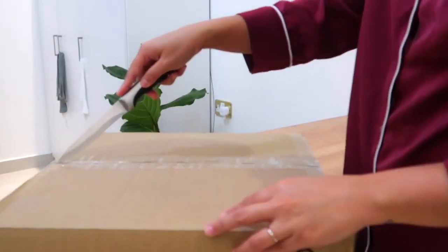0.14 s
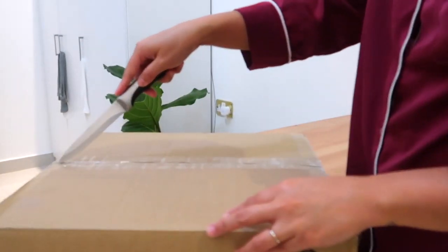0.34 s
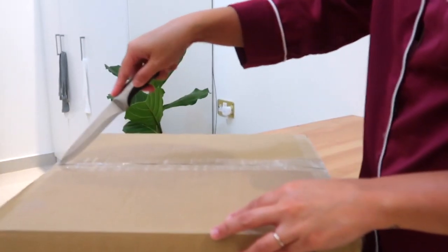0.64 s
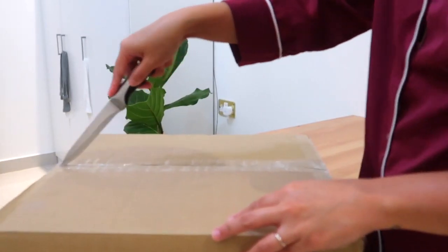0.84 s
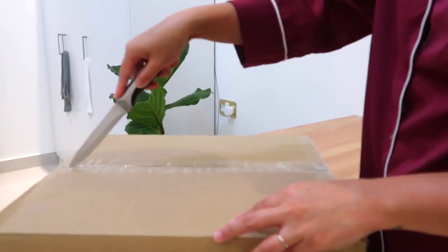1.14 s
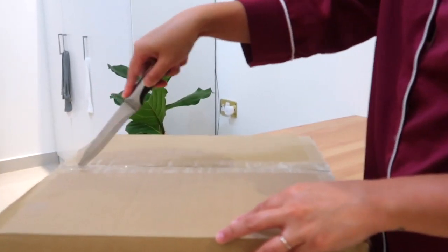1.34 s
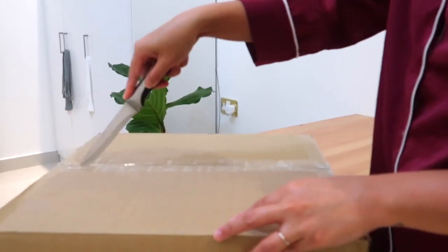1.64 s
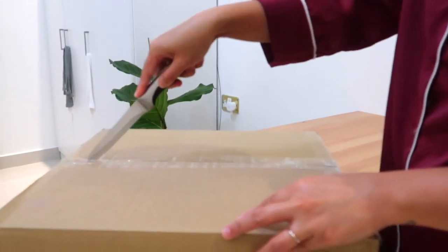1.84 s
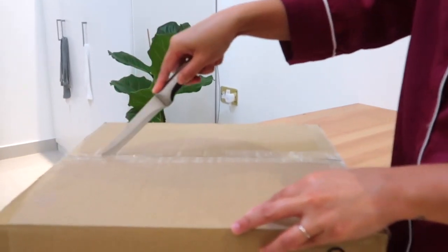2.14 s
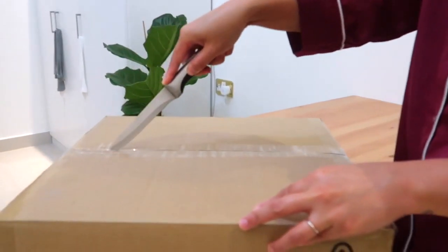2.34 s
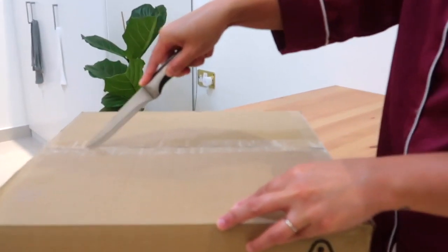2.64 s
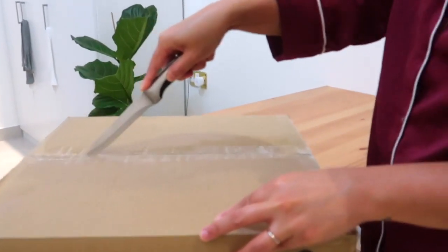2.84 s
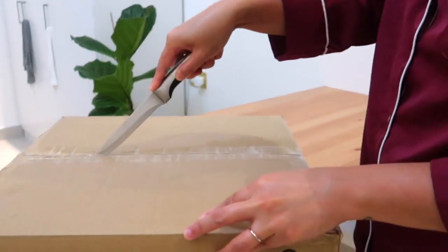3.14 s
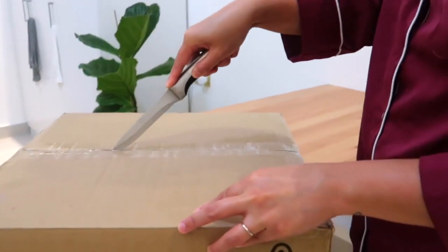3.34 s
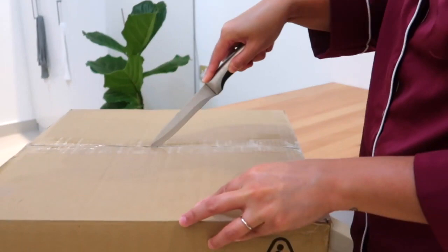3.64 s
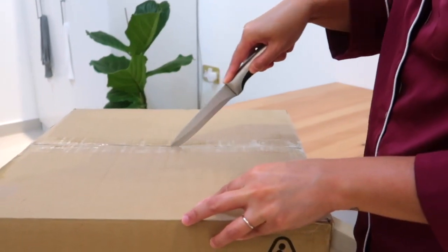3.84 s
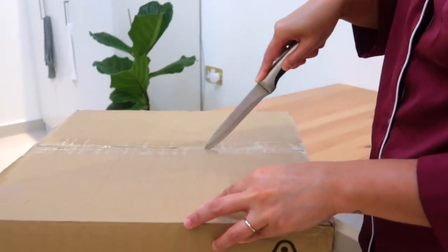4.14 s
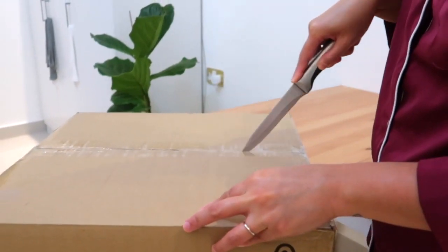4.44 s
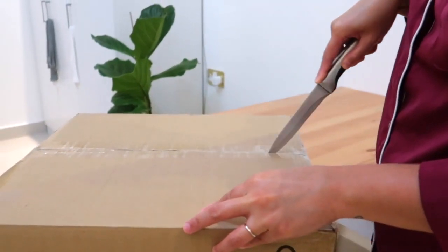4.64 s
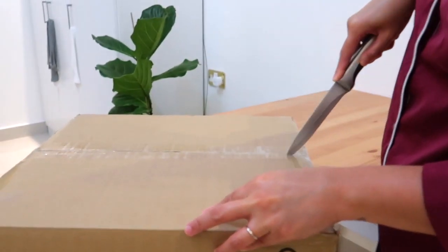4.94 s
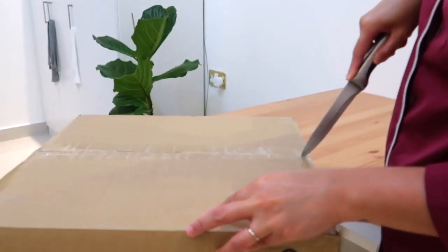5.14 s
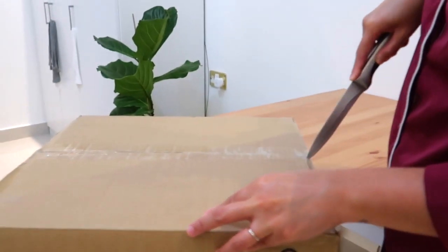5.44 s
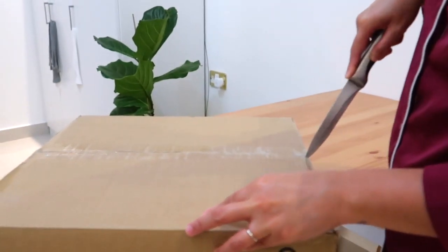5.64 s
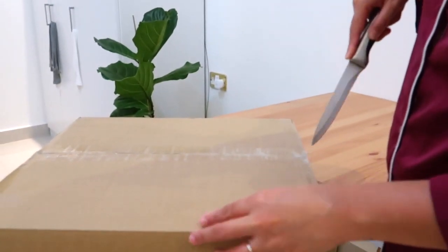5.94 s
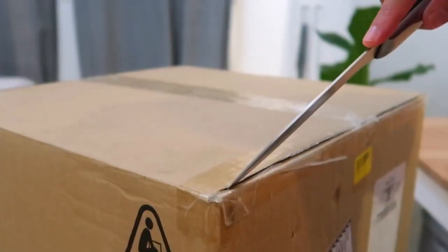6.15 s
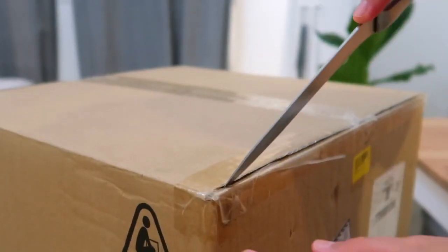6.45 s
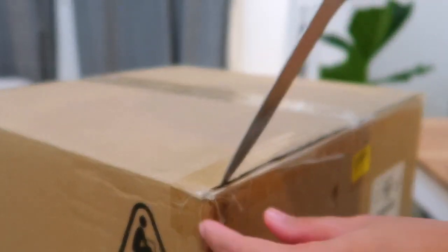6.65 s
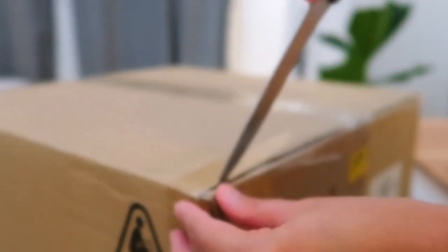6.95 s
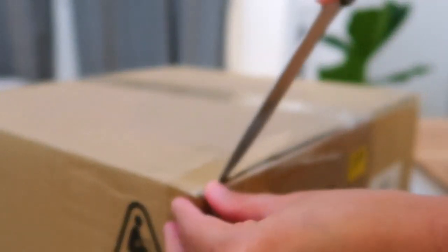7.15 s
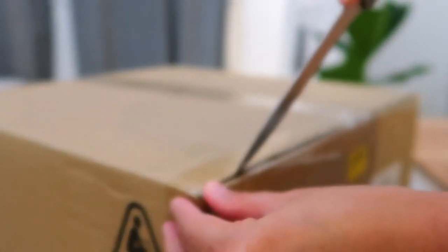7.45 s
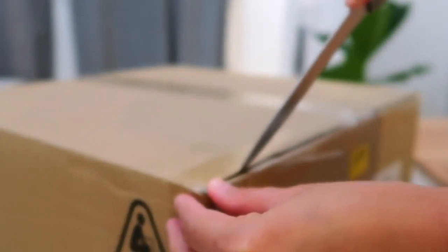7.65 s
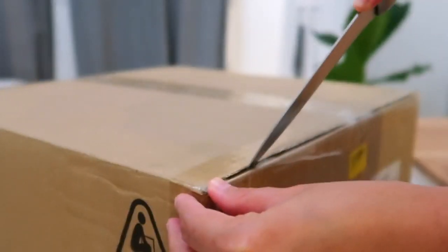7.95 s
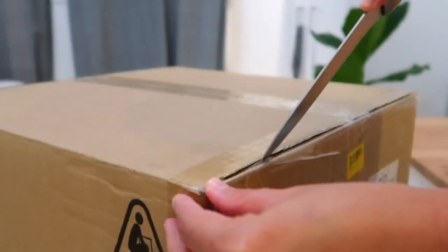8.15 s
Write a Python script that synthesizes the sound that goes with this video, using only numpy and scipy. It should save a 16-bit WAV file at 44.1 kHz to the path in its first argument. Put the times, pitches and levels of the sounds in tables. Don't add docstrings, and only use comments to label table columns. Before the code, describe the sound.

Close-up of a knife opening a cardboard box in a small reflective room. Dry fibre rasp and thin tape hiss come in uneven jerks, broken by sudden cracks, ticks and hollow booms. The cutting builds to its loudest knocks around the middle, falls to soft drag rumble, then returns in tight clusters of sharper snaps. A steady low mains hum and faint air lie underneath.

```python
import sys
import numpy as np
from scipy import signal
from scipy.fft import rfft, irfft, next_fast_len
from scipy.io import wavfile
from scipy.ndimage import uniform_filter1d

SR = 44100
rng = np.random.default_rng(int(sys.argv[2]) if len(sys.argv) > 2 else 0)


def makeup_ratio(level_db):
    decades = np.asarray(level_db, float) / 20
    return 10 ** decades


def unload_audio(sound):
    columns = np.transpose(np.atleast_2d(sound))
    steps = np.round(np.clip(columns, -1, 1) * 32767)
    wavfile.write(sys.argv[1], SR, steps.astype(np.int16))


N = 366471
T = np.arange(N) / SR

# start in seconds, length in seconds, speed as tape hiss in dB,
# bite into the board in dB over the hiss.
PULLS = [(0.0, 0.096, -66.5, 11.5), (0.268, 0.022, -68, -8), (1.068, .06, -67.5, 14),
         (1.22, 0.033, -77, 14), (1.397, 0.16, -74.5, 17), (1.73, 0.057, -77, 29),
         (1.984, .13, -67.5, 18.5), (2.222, 0.042, -68, 8), (2.38, 0.11, -73.5, 23.5), (2.51, 0.1, -69, 14),
         (2.815, 0.37, -65.5, 14.5), (3.197, 0.044, -58.5, 13), (3.264, 0.13, -63, 13),
         (3.368, .19, -60, 10), (3.574, 0.099, -58.5, 3), (3.697, 0.2, -58.5, 7), (3.99, 0.14, -66.5, 11),
         (4.082, 0.58, -60.5, 9.5), (4.656, 0.12, -53.5, 10), (4.79, 0.15, -68.5, 19.5),
         (4.992, .15, -61.5, 9), (5.194, 0.24, -70.5, 14), (5.98, .1, -79, 16), (6.21, 0.05, -80, 21),
         (6.818, 0.065, -61, -8), (6.975, .05, -76, 8), (7.455, 0.12, -62, 9), (7.898, 0.054, -61, 6),
         (8.066, .2, -64, -3)]
SWELL_SHARE, RELEASE_S = 0.29, 0.032
REST_HISS_DB, REST_RASP_DB = -81, -77
AFTER_DB, AFTER_S = -24, 0.064
# frequency in Hz, level in dB per Hz.
RASP_COLOUR = [(260, -8), (450, 2.5), (556, -0.5), (595, -6), (752, 5), (920, -3), (1440, -3.5),
               (3180, -12), (6500, -16), (8450, -38), (14300, -120)]
# frequency in Hz, level in dB per Hz.
HISS_COLOUR = [(2650, -2), (4500, -3), (6490, -1.5), (8330, -4.5), (12700, -4), (15200, -16), (15700, -33),
               (16000, -62)]
PATCHY_DB = 2.2
CRACKLE_PER_S, CRACKLE_DB, CRACKLE_SPREAD_DB, SCUFF_S = 35, -5, 5, .004
# time in seconds, level in dB.
SING = [
    (2.85, -73),
    (2.92, -64),
    (3.1, -67),
    (3.18, -75),
]
# frequency in Hz, width in Hz, level in dB.
BOX_MODES = [(113, 42, -1.5), (183, 66, 0), (270, 66, -8), (339.4, 42, -6)]
# time in seconds, drag rumble in dB.
LOAD = [(0, -60), (.4, -58), (1, -47.5), (1.5, -53), (2, -52), (3.1, -50), (3.7, -47.5), (4.35, -42),
        (4.7, -40.5), (5, -49), (5.45, -45), (5.8, -54), (6.4, -51.5), (7.1, -48.5), (7.6, -46),
        (8.31, -53)]

# frequency in Hz, level in dB per Hz.
AIR_COLOUR = [(12, -31), (20, -26), (49, -4.5), (97, -4.5), (118, -6), (151, -7.5), (217, -4.5),
              (263, -10.5), (511, -20.5), (587, -14.5), (914, -27), (3760, -39), (8380, -48),
              (11100, -55.5), (15000, -62)]
AIR_DB = -49
# frequency in Hz, side minus mid in dB.
AIR_SIDE = [(60, -59), (110, -37), (200, -21.5), (380, -4.5), (700, -9), (1290, 1), (2380, 1), (4400, 3),
            (8120, 1.5), (15000, 8)]
# frequency in Hz, level in dB, wobble in dB.
HUM = [(101, -44, -0.5), (148.1, -52, 1), (50.1, -60.5, -3.5), (191.1, -60.5, 6)]

# time in seconds, crack in dB, brightness in dB.
CATCHES = [(0.2781, -41.5, -2), (1.067, -40, -17), (1.2494, -40, -10), (2.0762, -39, -11),
           (2.204, -37, -10), (2.2613, -43.5, 3), (2.6609, -48, -13), (2.7017, -40, -5), (3.2872, -41, -16),
           (3.7776, -41.5, 2), (4.302, -33, -5), (5.0417, -39, -8), (5.0984, -53, -3), (5.6612, -45, -5),
           (6.2174, -47, -16), (6.7914, -49, -9), (8.005, -49, 7)]
# time in seconds, tick in dB.
TICKS = [(1.0764, -42), (1.4624, -46), (2.815, -47), (3.66, -46), (6.08, -51), (7.16, -48), (2.8, -35),
         (3.6227, -34.5), (4.0204, -40.5), (4.5467, -27.5), (7.3374, -38)]
# time in seconds, crack in dB, flap knock in dB, tape tick in dB.
SNAPS_TOP = [(1.1063, -24.5, -55, -38), (1.1166, -26, -31.5, -61), (1.2321, -32.5, -55, -52),
             (1.729, -27, -34, -47), (1.7373, -28, -40, -46), (1.7444, -22.5, -39, -47),
             (1.7544, -27, -59, -41), (2.1952, -25.5, -58, -55), (2.5242, -29, -44, -44),
             (2.5444, -34, -35, -40), (3.2171, -27, -45, -51), (3.2303, -28.5, -33.5, -41),
             (3.2448, -29.5, -40, -49), (3.5805, -34.5, -54, -60), (3.9235, -26.5, -31, -51),
             (4.0954, -33.5, -45, -38), (4.3611, -26.5, -31, -28.5), (4.4683, -37, -49, -37),
             (4.4943, -35.5, -39, -57), (4.6214, -32.5, -39, -42), (4.6745, -23.5, -26, -36),
             (4.6942, -17.5, -22, -28.5), (4.7664, -36, -44, -35), (5.1994, -34.5, -34.5, -50),
             (5.3628, -31.5, -36, -36), (5.3707, -13.5, -19, -59)]
# time in seconds, crack in dB, flap knock in dB, tape tick in dB.
SNAPS_SIDE = [(6.8273, -35.5, -41, -59), (6.8383, -34.5, -41, -53), (6.8621, -46, -45, -46),
              (6.8732, -30.5, -38, -83), (6.884, -40, -36, -45), (7.5156, -21.5, -23, -21.5),
              (7.572, -25, -31, -24.5), (7.911, -42.5, -57, -38.5), (7.9254, -41, -38.5, -39),
              (7.9474, -29.5, -51, -30.5), (8.1045, -32, -35.5, -33), (8.115, -28, -40, -33.5),
              (8.1328, -25.5, -34, -45), (8.1713, -24, -29, -30.5), (8.267, -26, -34, -33)]
# low edge in Hz, high edge in Hz, gain in dB.
PARTS = [
    (944, 2960, 1.5),
    (377, 778, 3.5),
    (2190, 6170, 4),
    (6800, 10950, -2),
]
CATCH_KNOCK_DB, TICK_BODY_DB = -4, -27
FIBRE_DB, FIBRE_SHARE = -7, 0.11
TEAR_TOP_MS, TEAR_SIDE_MS, TEAR_CATCH_MS, TEAR_TICK_MS = 1.64, 1.83, 1.2, 0.4
TABLE_DB = -7

# time in seconds, peak in dB, frequency in Hz.
THUMPS = [(1.106, -26, 183), (2.075, -28, 196), (2.423, -26.5, 229), (2.523, -25, 230), (2.843, -27, 208),
          (3.217, -26, 149), (3.577, -29, 193), (3.92, -24.5, 189), (4.298, -23, 148), (4.36, -10, 188),
          (4.468, -29, 143), (4.495, -22.5, 234), (4.621, -26, 203), (4.676, -23, 200), (4.695, -8, 186),
          (4.766, -28, 143), (5.372, -11.5, 256), (5.659, -32, 144), (5.909, -29, 184), (6.239, -29, 144),
          (7.516, -18, 294), (7.572, -22, 266), (7.947, -21.5, 295), (8.105, -28.5, 245), (8.169, -28, 234),
          (8.27, -24.5, 300)]
# time in seconds, peak in dB, frequency
# in Hz.
RINGS = [(1.107, -20.5, 820), (1.232, -35, 1420), (1.729, -27, 1880), (1.744, -30, 1880),
         (1.754, -18, 1750), (2.194, -31, 2020), (2.524, -42, 1830), (3.218, -27, 1360), (3.231, -33, 1430),
         (3.244, -27.5, 1330), (3.923, -26, 2980), (4.361, -19.5, 2030), (4.469, -29, 2480),
         (4.494, -32, 800), (4.677, -12.5, 2820), (4.695, -19, 706), (5.371, -42, 676),
         (6.826, -30.5, 1860), (6.871, -30.5, 1060), (7.516, -14.5, 1084), (7.572, -20, 1770),
         (7.948, -28.5, 1080), (8.133, -29, 700), (8.17, -25, 1900), (8.269, -20.5, 1370),
         (1.07, -31, 600), (2.429, -32, 580), (2.449, -33, 490), (2.66, -38, 1190), (3.931, -30, 1180),
         (1.744, -26, 476), (4.36, -28.5, 600), (5.373, -9.5, 505), (5.384, -22, 505), (4.36, -20, 331),
         (5.373, -10, 303)]

# low edge in Hz, high edge in Hz, decay time to -60 dB in seconds,
# level in dB, side minus mid in dB.
ROOM = [(63, 550, 0.49, -6, -70), (440, 2280, 0.41, -5.5, -32), (1370, 4400, 0.3, -3.5, -12),
        (4200, 10600, 0.28, -8, 2.5), (9250, 25000, 0.058, -13, 13.5)]
WALL_S, WALL_DB, WALLS_FROM_S = .026, -7, .011


def unit(x):
    return x / np.sqrt(np.mean(x ** 2))


def band(x, lo_hz, hi_hz):
    return signal.sosfilt(signal.butter(2, [lo_hz, min(hi_hz, .45 * SR)], "band", fs=SR, output="sos"), x)


def ring(x, hz, width_hz):
    return signal.lfilter(*signal.iirpeak(hz, hz / width_hz, fs=SR), x)


def fading(x, fade_s):
    return signal.lfilter([1], [1, -np.exp(-1 / (fade_s * SR))], x)


def colour(x, points):
    hz, db = np.transpose(points)
    size = next_fast_len(N)
    f = np.arange(size // 2 + 1) * SR / size + 1
    gain = makeup_ratio(np.interp(np.log(f), np.log(hz), db))
    return irfft(rfft(x, size) * gain, size)[:N]


def walk(rate):
    hold = int(SR / rate)
    steps = np.repeat(rng.standard_normal(N // hold + 1), hold)
    return unit(uniform_filter1d(uniform_filter1d(steps, hold), hold)[:N])


def sparse_slips(rate, spread_db, limit):
    return (rng.random(N) < rate / SR) * makeup_ratio(spread_db * np.minimum(rng.exponential(size=N), limit))


def grit(rate, spread_db):
    slips = sparse_slips(rate, spread_db, 4)
    return unit(rng.standard_normal(N) * (1 + slips))


def patchy(x):
    centres_hz = 500 * 2 ** np.arange(0, 5, 1 / 3)
    return sum(ring(x, hz, .3 * hz) * makeup_ratio(PATCHY_DB * walk(rate=14)) for hz in centres_hz)


def effort():
    rasp, hiss = makeup_ratio(REST_RASP_DB) + 0 * T, makeup_ratio(REST_HISS_DB) + 0 * T
    for s, length, db, bite_db in PULLS:
        swell = np.clip((T - s) / (SWELL_SHARE * length) + 0.22, 0, 1)
        shape = swell * np.exp(-np.maximum(T - s - length, 0) / RELEASE_S)
        rasp = rasp + makeup_ratio(db + bite_db) * shape
        hiss = hiss + makeup_ratio(db) * shape
    kicks = np.zeros(N)
    for s, crack_db, *_ in catches():
        kicks[int(s * SR)] = makeup_ratio(crack_db + AFTER_DB)
    return rasp + fading(kicks, AFTER_S), hiss


def crackle():
    out = 0
    for lo_hz, hi_hz, db in [(900, 3000, 0), (2000, 6500, 0), (5000, 11000, -5)]:
        scuffs = fading(sparse_slips(CRACKLE_PER_S, CRACKLE_SPREAD_DB, 2.5), SCUFF_S)
        out = out + makeup_ratio(db) * unit(band(scuffs * rng.standard_normal(N), lo_hz, hi_hz))
    return unit(out)


def box_rumble():
    drag = rng.standard_normal(N) * makeup_ratio(2.5 * walk(rate=18))
    modes = sum(makeup_ratio(db) * ring(ring(drag, hz, w), hz, 1.27 * w) for hz, w, db in BOX_MODES)
    return unit(modes) * makeup_ratio(np.interp(T, *np.transpose(LOAD)))


def slide():
    rasp_gain, hiss_gain = effort()
    slips = patchy(grit(rate=1200, spread_db=4.5)) * makeup_ratio(1.6 * walk(rate=45))
    rasp = unit(colour(slips, RASP_COLOUR)) * makeup_ratio(-5.5) * rasp_gain
    hiss = unit(colour(slips, HISS_COLOUR)) * makeup_ratio(3.5 + 0.19 * walk(rate=60)) * hiss_gain
    sing_gain = makeup_ratio(np.interp(T, *np.transpose(SING), -90, -90))
    sing = unit(ring(ring(slips, 2260, 600), 1720, 800)) * sing_gain
    tufts = crackle() * np.sqrt(rasp_gain * hiss_gain) * makeup_ratio(CRACKLE_DB)
    return rasp + sing + hiss + tufts + box_rumble()


def appliance():
    mid = colour(rng.standard_normal(N), AIR_COLOUR)
    side = colour(colour(rng.standard_normal(N), AIR_COLOUR), AIR_SIDE)
    air = makeup_ratio(AIR_DB) / np.std(band(mid, 270, 12000)) * np.array([mid + side, mid - side])
    hum = 0
    for hz, db, wobble_db in HUM:
        level = np.sqrt(2) * makeup_ratio(db + wobble_db * walk(rate=6.7))
        hum = hum + level * np.sin(2 * np.pi * hz * T + 0.5 * walk(rate=3.02))
    return air + hum


def catches():
    rows = [(*r, TEAR_TOP_MS) for r in SNAPS_TOP] + [(*r, TEAR_SIDE_MS) for r in SNAPS_SIDE]
    rows += [(s, db, db + CATCH_KNOCK_DB, db + bright_db, TEAR_CATCH_MS) for s, db, bright_db in CATCHES]
    rows += [(s, db + TICK_BODY_DB, db + TICK_BODY_DB, db, TEAR_TICK_MS) for s, db in TICKS]
    return [(s, crack, knock, crack + FIBRE_SHARE * (tick - crack) + FIBRE_DB, tick, ms)
            for s, crack, knock, tick, ms in rows]


def snaps():
    out, t = np.zeros(N + 2048), np.arange(2048) / SR
    for s, *part_dbs, ms in catches():
        noise = rng.standard_normal(2048)
        k = t / (ms / 1000)
        tear = rfft(noise * k * np.exp(-k))
        tear = irfft(tear / np.abs(tear) ** 0.96) * (k < 8)
        tear += makeup_ratio(TABLE_DB) * np.roll(tear, 44 + int(10 * noise[0]))
        for (lo_hz, hi_hz, gain_db), db in zip(PARTS, part_dbs):
            x = band(tear, lo_hz, hi_hz)
            out[int(s * SR):][:2048] += x / np.abs(x).max() * makeup_ratio(db + gain_db)
    return out[:N]


def swings(events, rise_s, cycles, gain_db, lag_s):
    out, t = np.zeros(N + 4096), np.arange(2048) / SR
    for s, db, hz in events:
        x = np.sin(2 * np.pi * hz * t) * (1 - np.exp(-t / rise_s)) * np.exp(-t * hz / cycles)
        out[int((s + lag_s) * SR):][:2048] += x / np.abs(x).max() * makeup_ratio(db + gain_db)
    return band(out[:N], 77, 7700)


def thumps():
    boom = swings(THUMPS, rise_s=0.0021, cycles=0.97, gain_db=-2.3, lag_s=0.0023)
    panels = swings(RINGS, rise_s=0.00027, cycles=2.7, gain_db=-3.5, lag_s=0.00067)
    return boom + panels


def room(x):
    t = np.arange(SR // 2) / SR
    tail = np.zeros((2, len(t)))
    for lo_hz, hi_hz, t60, db, side_db in ROOM:
        mid, side = band(rng.standard_normal((2, len(t))), lo_hz, hi_hz)
        fade = makeup_ratio(-60 * t / t60) * np.clip(t / WALLS_FROM_S, 0, 1) ** 3
        tail += makeup_ratio(db) * fade / np.sqrt(np.sum(fade ** 2)) * np.array([mid, makeup_ratio(side_db) * side])
    tail[0, 0] += 1
    slap = 1. * (np.arange(len(t)) == int(WALL_S * SR))
    tail[0] += makeup_ratio(WALL_DB) * band(slap, 45, 268)
    mid, side = signal.fftconvolve(x[None], tail, axes=1)[:, :N]
    return np.array([mid + side, mid - side])


def scene():
    return room(slide() + snaps() + thumps()) + appliance()


def low_pass(x):
    return signal.sosfilt(signal.butter(12, 16480, fs=SR, output="sos"), x)


def record(dry):
    top = signal.cheby2(10, 60, 16900, fs=SR, output="sos")
    mix = signal.sosfilt(top, dry)
    return low_pass(mix)


dry = scene()
out = record(dry)
unload_audio(out)
```